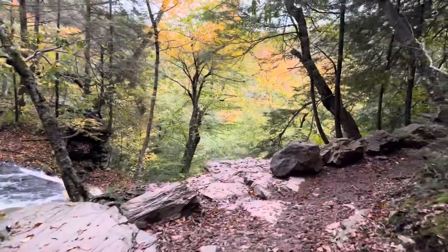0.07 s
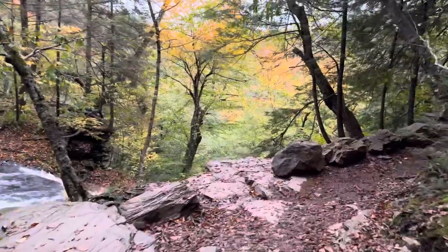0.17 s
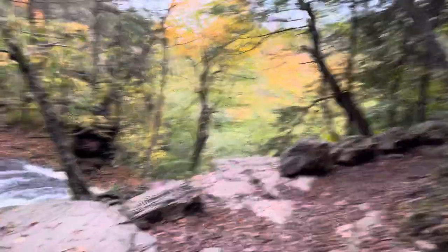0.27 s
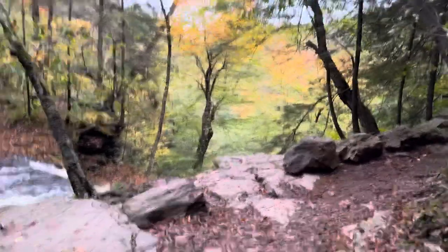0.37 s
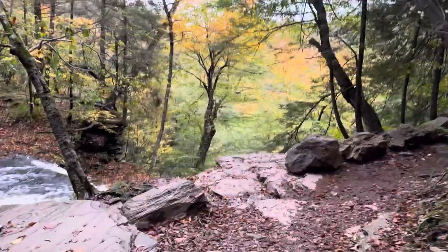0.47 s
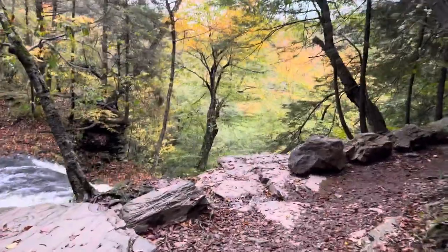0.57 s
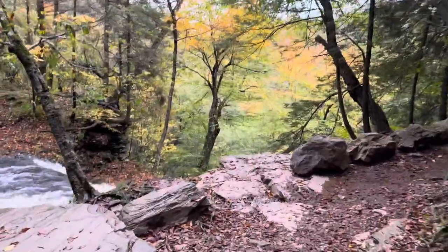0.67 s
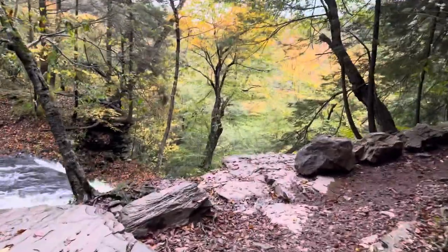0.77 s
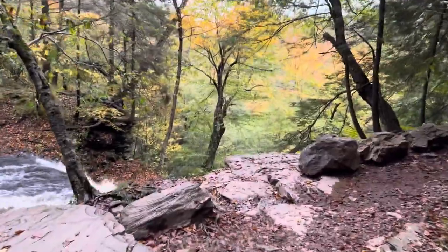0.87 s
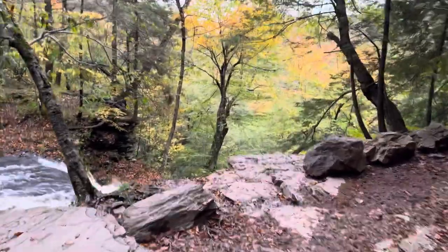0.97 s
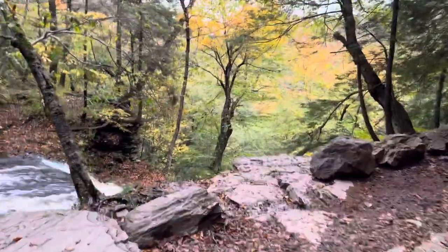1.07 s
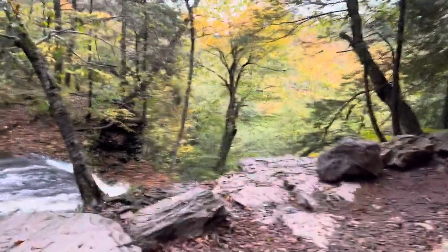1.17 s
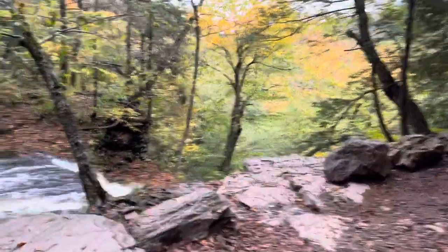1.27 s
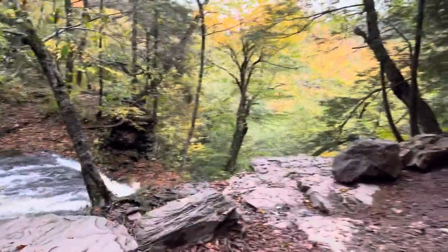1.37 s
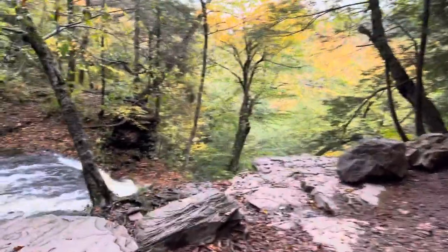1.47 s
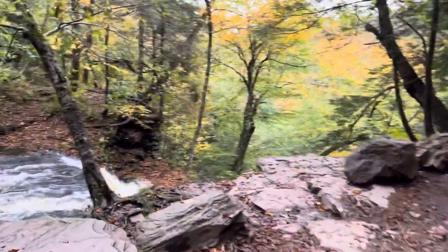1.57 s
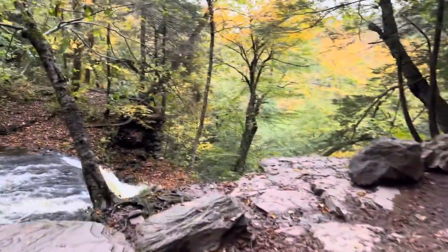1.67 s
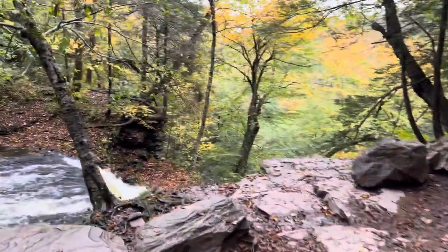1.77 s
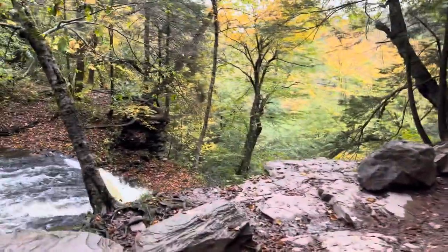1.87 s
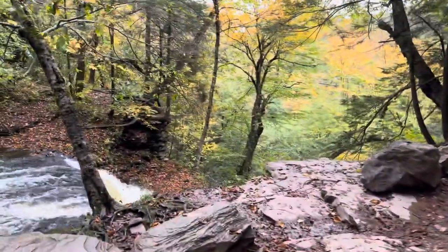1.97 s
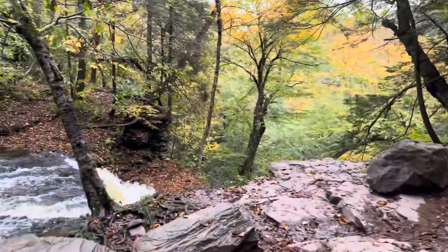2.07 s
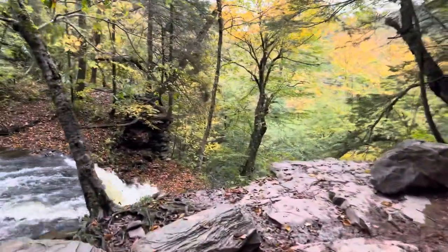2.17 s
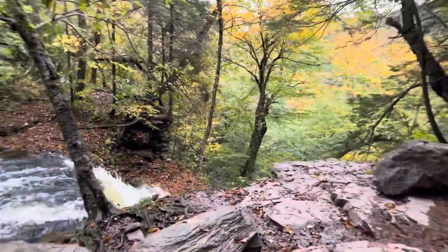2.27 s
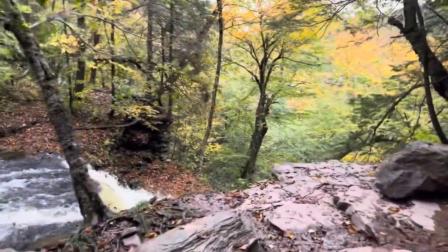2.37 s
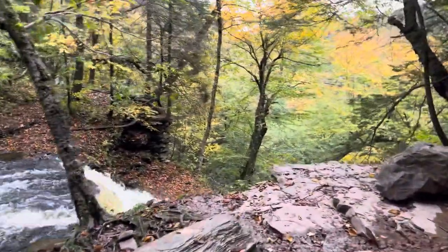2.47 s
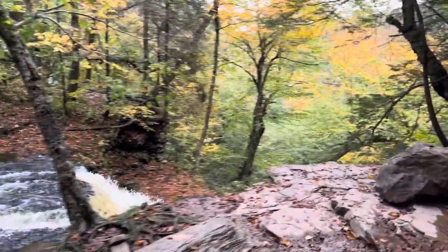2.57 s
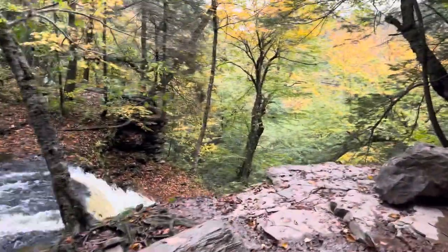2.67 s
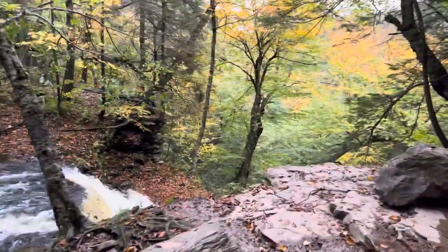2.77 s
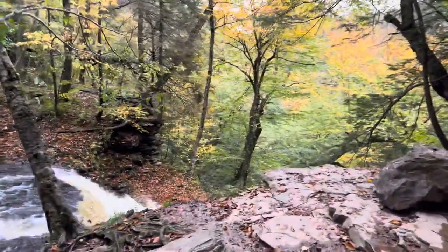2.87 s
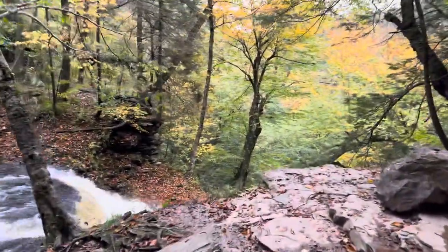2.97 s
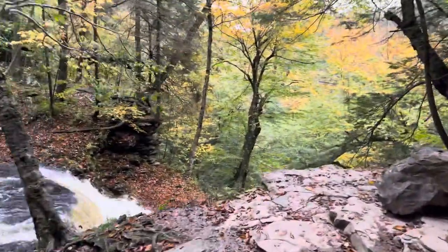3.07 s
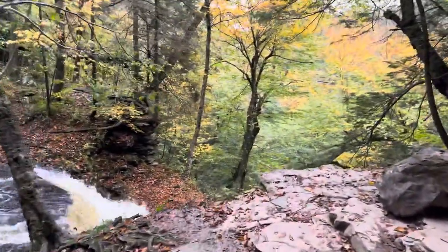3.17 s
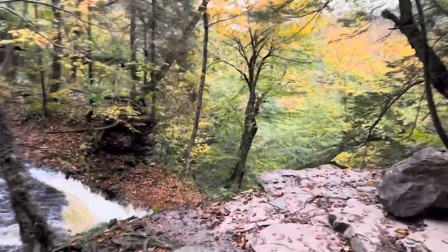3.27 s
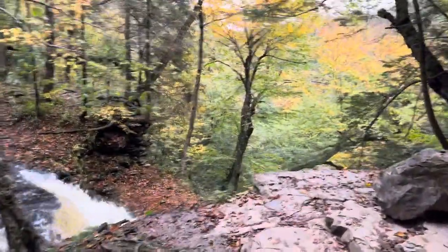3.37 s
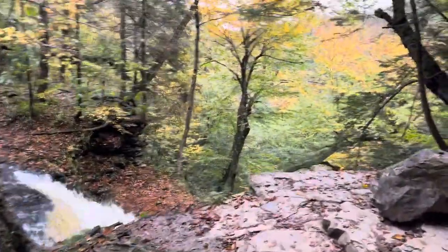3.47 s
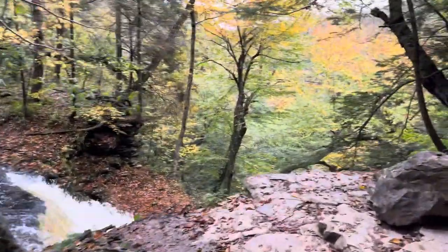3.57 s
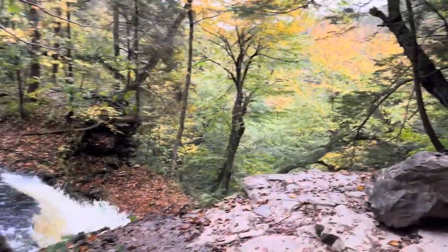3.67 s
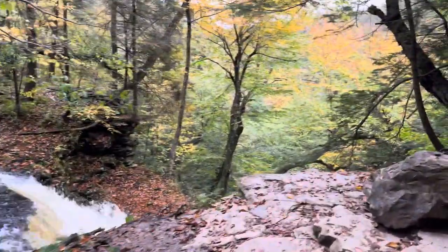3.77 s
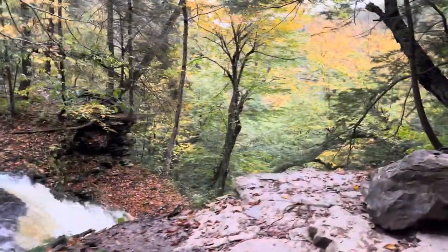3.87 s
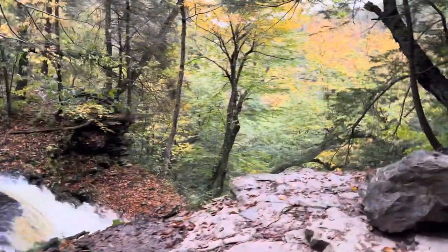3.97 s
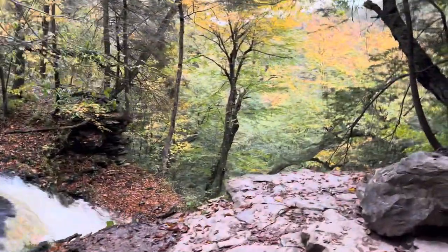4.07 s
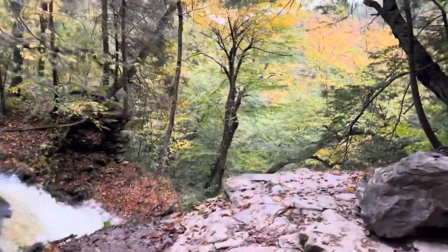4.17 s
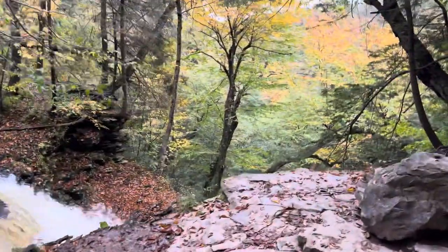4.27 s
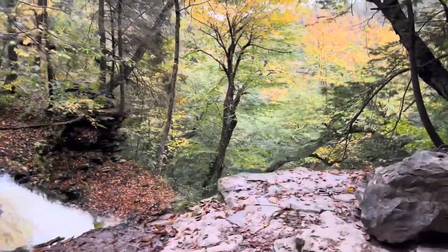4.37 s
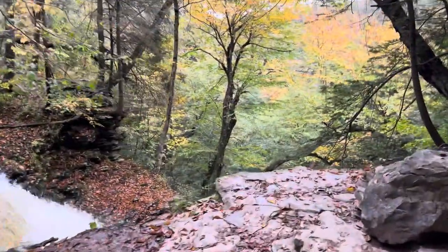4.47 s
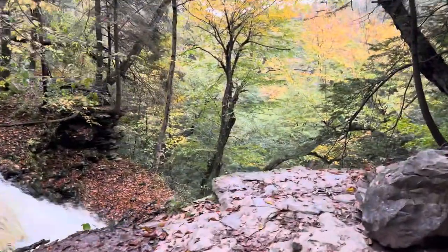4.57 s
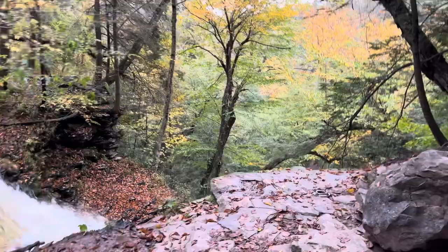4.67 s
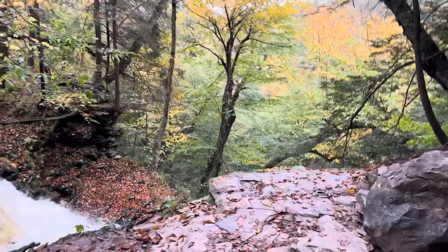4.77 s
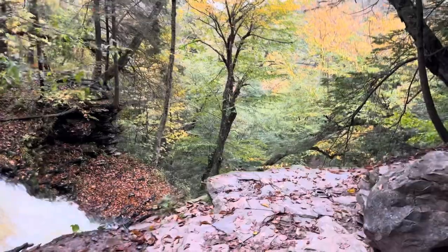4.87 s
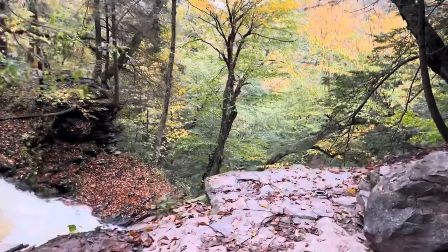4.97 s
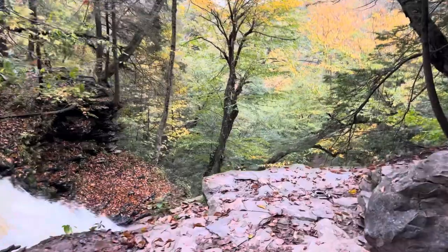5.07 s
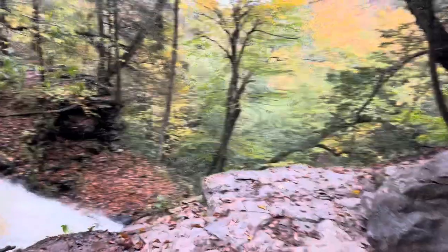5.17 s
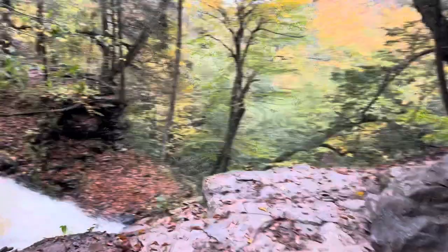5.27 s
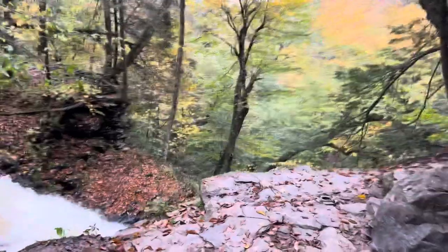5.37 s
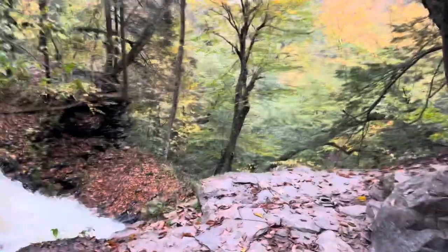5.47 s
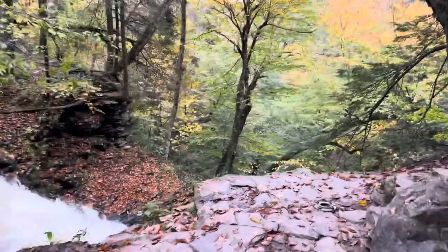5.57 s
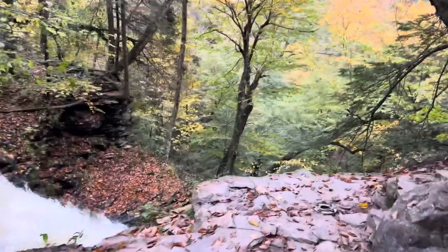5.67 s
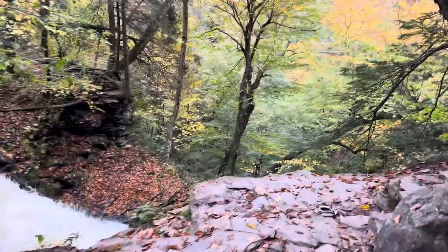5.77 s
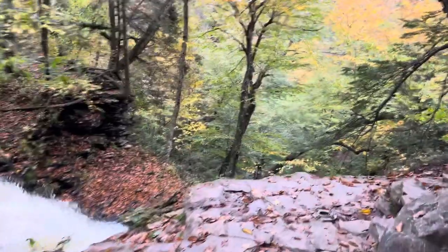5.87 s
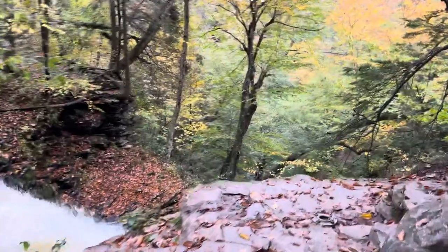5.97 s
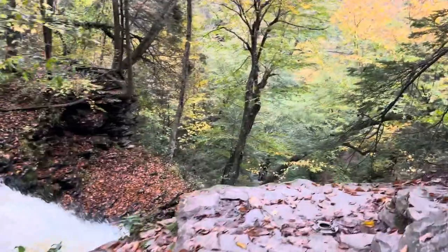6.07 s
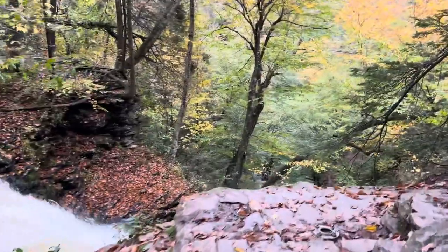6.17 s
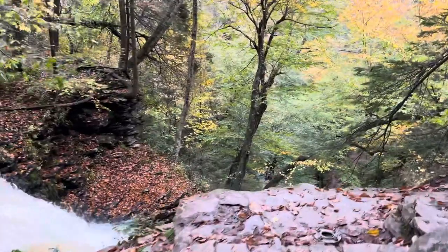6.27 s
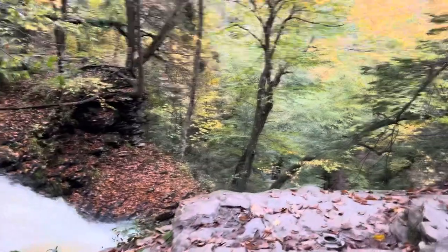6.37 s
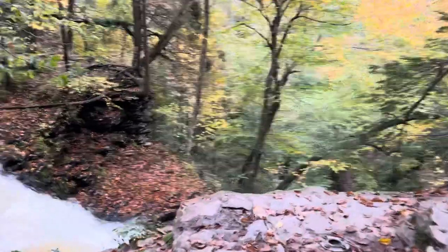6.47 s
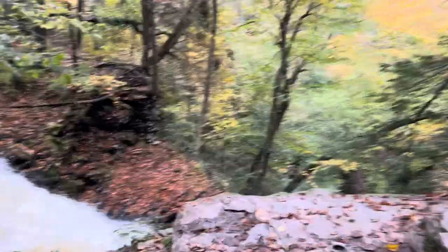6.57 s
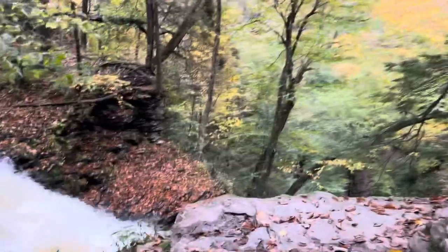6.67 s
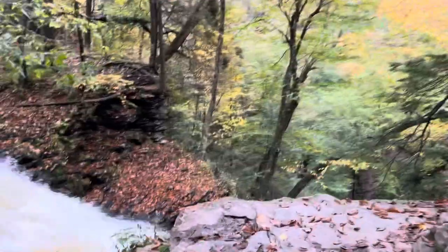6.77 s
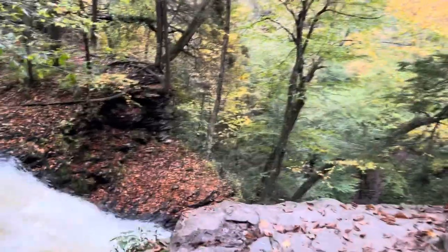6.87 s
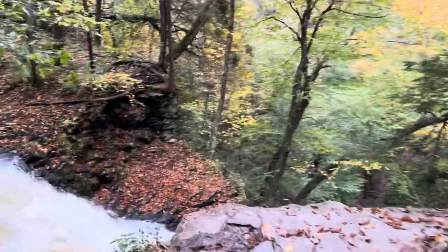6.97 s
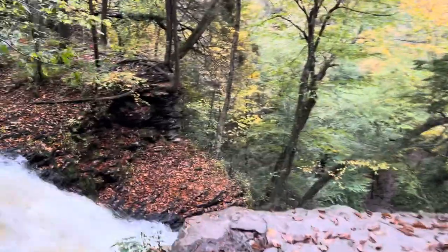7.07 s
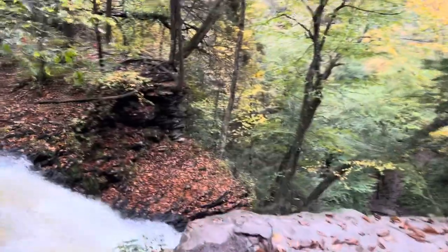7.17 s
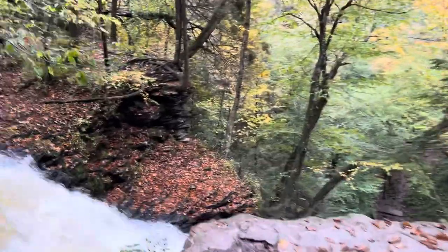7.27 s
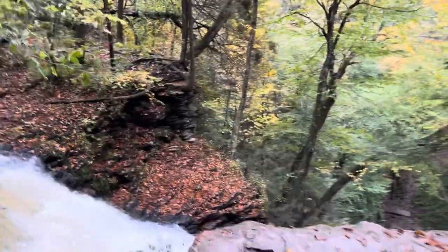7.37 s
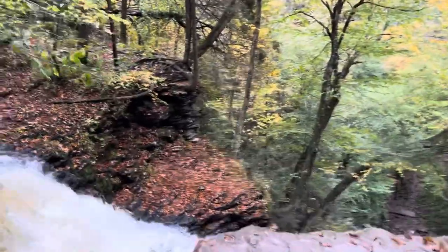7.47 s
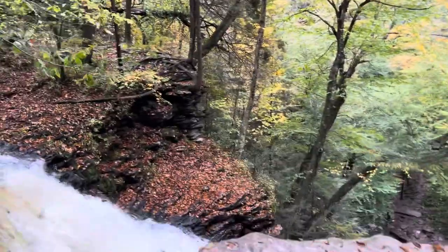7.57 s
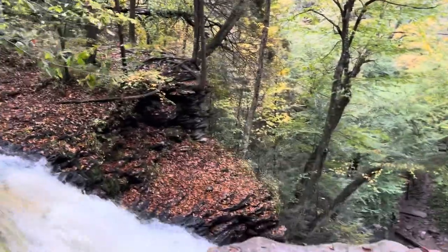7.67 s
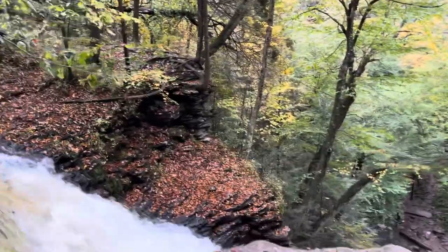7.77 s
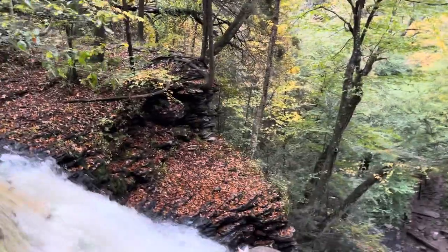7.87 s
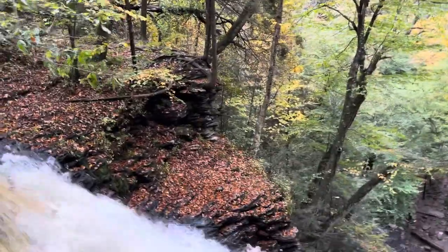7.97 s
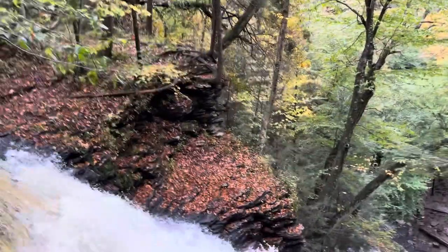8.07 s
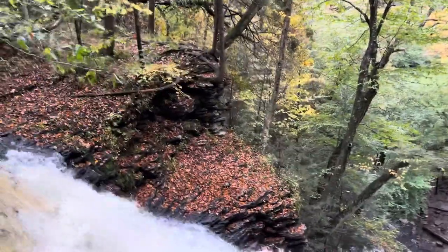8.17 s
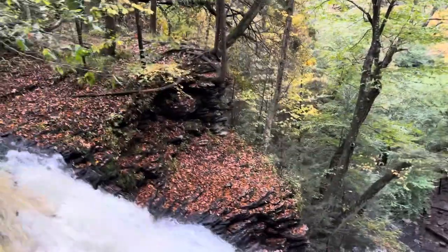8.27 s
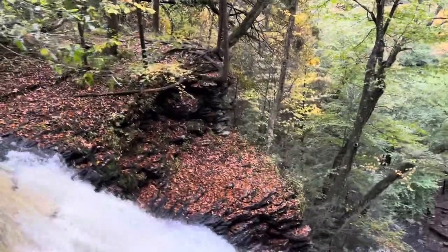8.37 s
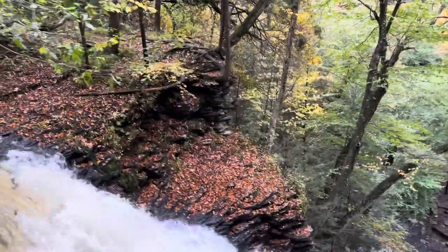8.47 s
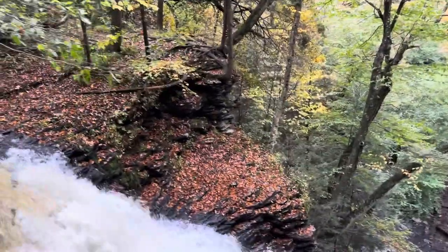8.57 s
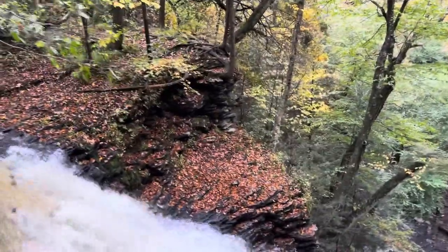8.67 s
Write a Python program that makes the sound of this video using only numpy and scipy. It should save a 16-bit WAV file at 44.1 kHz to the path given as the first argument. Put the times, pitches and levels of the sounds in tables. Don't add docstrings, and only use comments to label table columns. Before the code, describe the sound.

Continuous broadband rush of heavy white water, outdoors in a wooded gorge, heard from a phone carried over rock towards the edge. Deep rumble supports a thick mid roar and fine airy hiss. Short soft buffets of wind press on the microphone. The water grows closer, brighter and roughly twice as loud by the end, nearly overloading.

```python
import sys
import numpy as np
from scipy import signal
from scipy.fft import rfft, irfft, next_fast_len
from scipy.io import wavfile
from scipy.ndimage import uniform_filter1d, map_coordinates

SR = 44100
rng = np.random.default_rng(int(sys.argv[2]) if len(sys.argv) > 2 else 0)


def generate_wav(sig):
    pcm = np.round(np.clip(np.atleast_2d(sig).T, -1, 1) * 32767).astype(np.int16)
    wavfile.write(sys.argv[1], SR, pcm)


def attenuation_scalar(level_db):
    decades = np.asarray(level_db, float) / 20
    return 10 ** decades


N = 384111
SIZE = next_fast_len(N)
HZ = np.maximum(np.arange(SIZE // 2 + 1) * SR / SIZE, 1)
TOP_FROM_HZ = 8000


def waterfall():
    # start_s, roar_db, shelter_db (rock lip hides the splash, not the plunge)
    approach = [(0, -22.5, -0.5), (.9, -22.5, -2), (2, -21, -1.5), (3.2, -20.5, -.5), (4.2, -19.5, -.5),
                (5.2, -18.5, 1), (5.9, -19, 2), (6.6, -18, 0), (7, -17, 1.5), (7.9, -15.7, 0),
                (8.7, -15, -.5)]
    # freq_hz, slope_level_db
    water_colour = [(20, -38), (32, -26), (45, -11.5), (75, -0.5), (180, 0.4), (300, -3.5), (420, -5.5),
                    (490, -6.5), (950, -10.5), (1900, -15), (3100, -17), (7600, -19), (11000, -26),
                    (15700, -28.5)]
    # freq_hz, gain_db
    closer = [(35, -1.5), (100, 0.7), (400, 0), (600, 1.3), (800, -0.6), (1150, 1.9), (1400, -1.5),
              (1900, -0.6), (2250, 2.5), (3000, -0.9), (4500, -0.9), (8000, -1.46), (12000, 1.6),
              (15000, 2)]
    zones_hz = (60, 200, 600, 7000, 12000)
    shelter_shares = (.5, 1, -.2)
    far_db, near_db = -19, -13
    turn_s, turn_takes_s = 3.9, .6
    pan_before_db, pan_after_db = .3, .56
    open_boom_db, open_from_s, open_to_s = 3, .86, 3.8
    spray_db, trim_db = 3, .15
    lag_wobble_rad = .17
    frame = 2048
    overlap = frame * 3 // 4

    water = ports(shower(), shower()) * attenuation_scalar(along(water_colour, HZ))
    middle = irfft(water.mean(axis=0) * (HZ > 400) * (HZ < 7500), SIZE)
    steady = irfft(water, SIZE)[:, :N] / np.std(middle)
    hz, s, cells = signal.stft(steady, SR, nperseg=frame, noverlap=overlap)
    hz = np.maximum(hz, 10)

    times_s, roar_db, shelter_db = np.transpose(approach)
    roar = np.interp(s, times_s, roar_db)
    shelter = np.interp(s, times_s, shelter_db)
    turned = np.clip((s - turn_s) / turn_takes_s + .5, 0, 1)
    pan = pan_before_db + (pan_after_db - pan_before_db) * turned

    boom, rumble, spray = np.outer(shelter_shares, shelter)
    facing_gorge = 1. * (s > open_from_s) * (s < open_to_s)
    boom = boom + open_boom_db * uniform_filter1d(facing_gorge, size=30)
    zones = np.array([boom, rumble, 0 * s, 0 * s, spray + spray_db])
    place = np.interp(np.log(hz), np.log(zones_hz), np.arange(5))
    shares = np.clip(1 - np.abs(place[:, None] - np.arange(5)), 0, 1)

    # -.5 at far_db, .5 at near_db
    near = (uniform_filter1d(roar, size=40) - far_db) / (near_db - far_db) - .5
    db = roar + shares @ zones + np.outer(along(closer, hz), near) + trim_db
    db = db + .25 * patches(hz, s, 8.0, 3.0)
    db = db + .7 * patches(hz, s, 22.0, .3)

    tremble = lag_wobble_rad * patches(hz, s, 35., .2) * (hz > TOP_FROM_HZ)[:, None]
    left = attenuation_scalar(pan / 2) * np.exp(.5j * tremble)
    right = attenuation_scalar(-pan / 2) * np.exp(-.5j * tremble)
    moving = cells * attenuation_scalar(db) * np.array([left, right])
    return signal.istft(moving, SR, nperseg=frame, noverlap=overlap)[1][:, :N]


def shower():
    impacts_per_s, spread_db = 36000, .8
    size_draw, sign_draw, hit_draw = rng.random((3, SIZE))
    size = attenuation_scalar(-spread_db * np.log(1 - size_draw)) * np.sign(sign_draw - .5)
    return rfft(size * (hit_draw < impacts_per_s / SR))


def ports(direct, scattered):
    # freq_hz, likeness_0_1, left_lead_rad, left_minus_right_db
    port_pair = [(100, 0.98, .03, -1.2), (306, 1, 0.08, 1.5), (660, 0.6, 0.39, -0.7), (1230, 0.51, 0.19, 0),
                 (1490, 0.32, 1.45, 2), (2160, 0.4, 0.45, 2), (3150, 0.37, -1.8, 0), (3500, 0.5, -0.88, -1),
                 (4100, .43, -0.77, -0.5), (5050, 0.08, 0.58, -3.5), (5630, 0, -1.5, -1.5),
                 (6400, .43, -1.4, -3.5), (7350, 0.64, 0.65, -2.5), (7900, 0.4, 0.77, -4)]
    # freq_hz, left_lead_rad
    top_lead = [(8000, -3.9), (8330, -3.66), (8950, -3.28), (9560, -3.05), (9700, -2.2), (11050, 0),
                (11800, .75), (12600, 2.05), (13000, 2.65), (14250, 3.95), (14500, 4.7), (15600, 6.35)]
    # freq_hz, width_hz, gain_db
    hollows = [(1200, 290, 3.5), (2320, 890, 2.75)]
    # freq_hz, width_hz, gain_db
    cavity = (9050, 1700, 5.5)
    top = HZ > TOP_FROM_HZ
    alike = np.clip(np.where(top, .995, along(port_pair, HZ, column=1)), 0, 1)
    lead = np.where(top, along(top_lead, HZ), along(port_pair, HZ, column=2))
    balance = attenuation_scalar(np.where(top, 0, along(port_pair, HZ, column=3)) / 2)
    ring_db = 0
    for hz, width_hz, db in [*hollows, cavity]:
        ring_db = ring_db + db * np.exp(-(2 * (HZ - hz) / width_hz) ** 2)
    right = alike * np.exp(-1j * lead) * direct + np.sqrt(1 - alike ** 2) * scattered
    return np.array([direct * balance, right / balance]) * attenuation_scalar(ring_db)


def patches(hz, s, rate_hz, octaves):
    knots = rng.standard_normal((64, 600))
    places = np.meshgrid(np.log2(hz / 10) / octaves, s * rate_hz, indexing="ij")
    return map_coordinates(knots, places, order=1, mode="nearest") * 1.4


def along(table, hz, column=1):
    rows = np.array(table, float)
    return np.interp(np.log(hz), np.log(rows[:, 0]), rows[:, column])


def port_air():
    # peak_s, level_db
    gusts = [(.55, -29), (.92, -31), (1.1, -26), (1.6, -26), (2.06, -30), (2.2, -29), (2.62, -19),
             (3.08, -22.5), (3.28, -21), (3.41, -21), (3.66, -20), (4.07, -24), (4.51, -18.5), (5.0, -32),
             (5.5, -28), (5.74, -27), (6.07, -25), (7.26, -26), (7.48, -26), (7.92, -31)]
    rise_db_per_s, fall_db_per_s = 110, 92
    breeze_from_s, breeze_to_s, breeze_db, calm_db = .9, 5.8, -37.5, -44.5
    shape = (HZ / 62.) ** 3.88 / (1 + (HZ / 52.0) ** 5.29)
    eddies = rfft(rng.standard_normal(SIZE)) * shape
    common = attenuation_scalar(5.5) * eddies
    difference = eddies * np.exp(1j * 1.87)
    air = irfft(np.array([common + difference, common - difference]), SIZE)[:, :N]

    t = np.arange(N) / SR
    in_breeze = 1. * (t > breeze_from_s) * (t < breeze_to_s)
    draught = attenuation_scalar(calm_db) + attenuation_scalar(breeze_db) * uniform_filter1d(in_breeze, size=SR // 4)
    puffs = np.zeros(N)
    for peak_s, db in gusts:
        drop_db = np.where(t < peak_s, rise_db_per_s * (peak_s - t), fall_db_per_s * (t - peak_s))
        puffs += attenuation_scalar(db - drop_db)
    return air / np.std(air) * (draught + puffs)


def scene():
    return waterfall() + port_air()


def band_limit(x):
    return signal.sosfilt(signal.butter(12, 17050, fs=SR, output="sos"), x)


def record(dry):
    top_hz = 15760
    cut = irfft(rfft(dry, SIZE) * (HZ < top_hz), SIZE)[:, :N]
    return band_limit(cut)


dry = scene()
out = record(dry)
generate_wav(out)
```